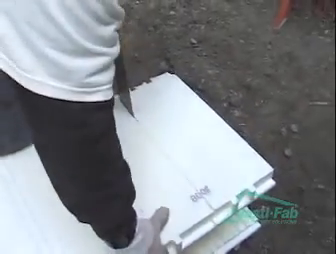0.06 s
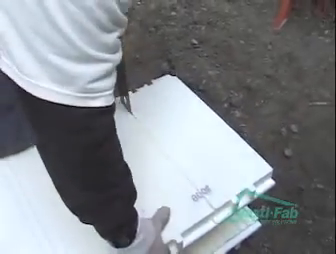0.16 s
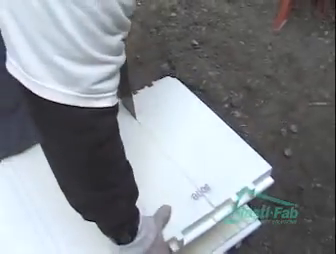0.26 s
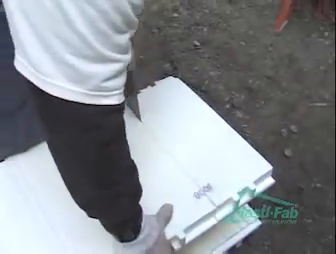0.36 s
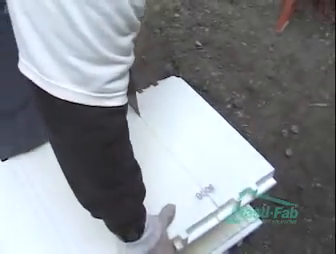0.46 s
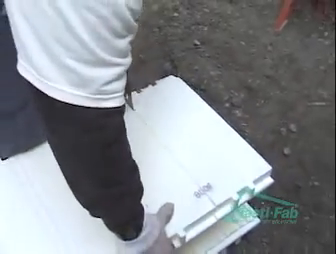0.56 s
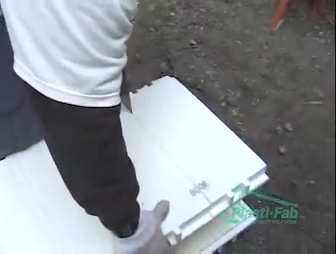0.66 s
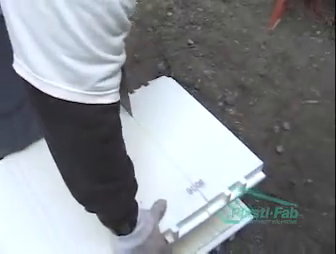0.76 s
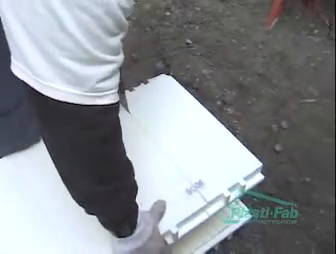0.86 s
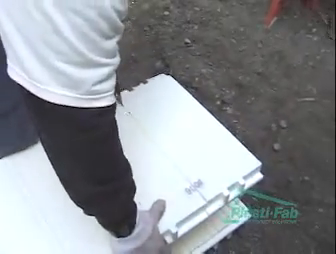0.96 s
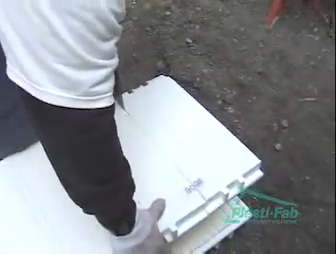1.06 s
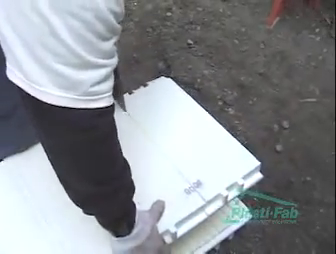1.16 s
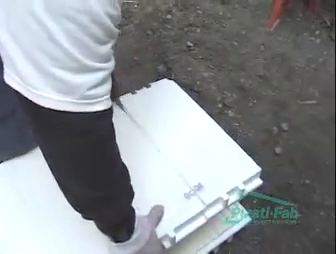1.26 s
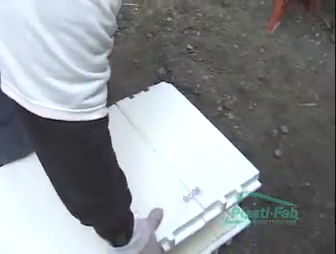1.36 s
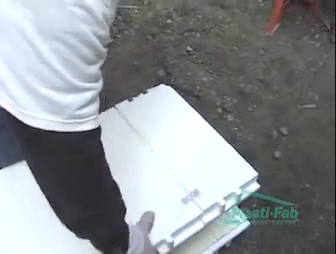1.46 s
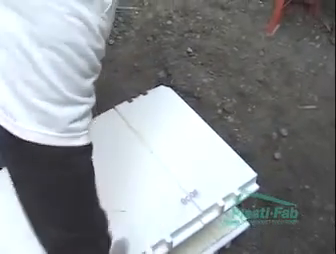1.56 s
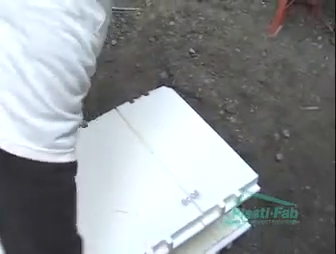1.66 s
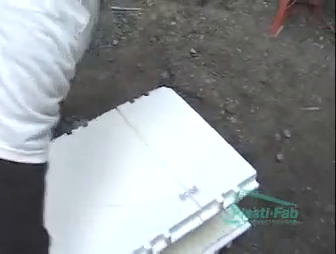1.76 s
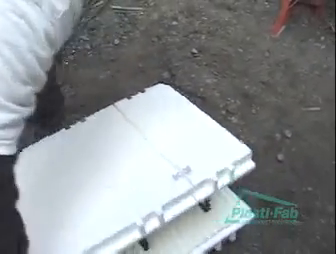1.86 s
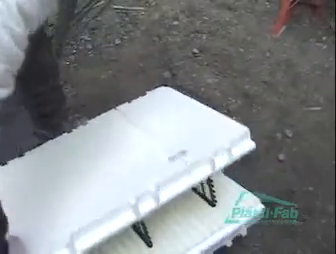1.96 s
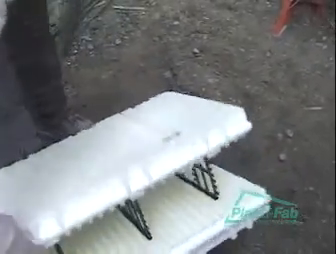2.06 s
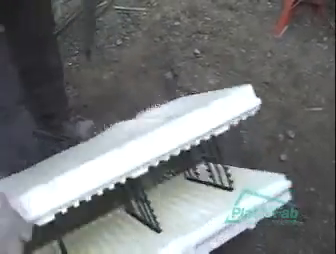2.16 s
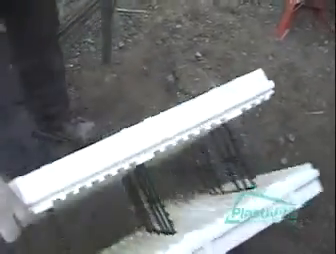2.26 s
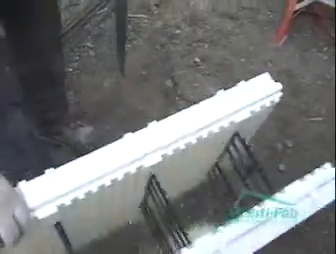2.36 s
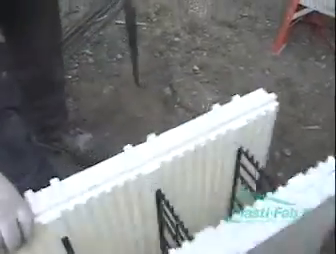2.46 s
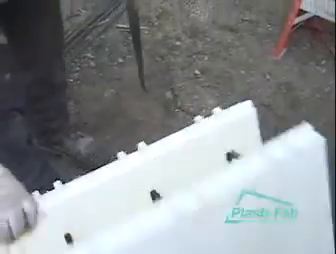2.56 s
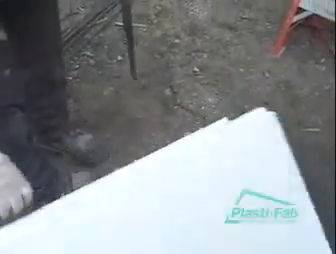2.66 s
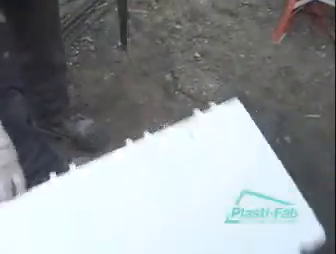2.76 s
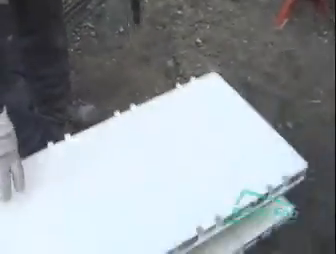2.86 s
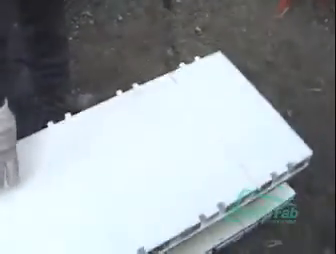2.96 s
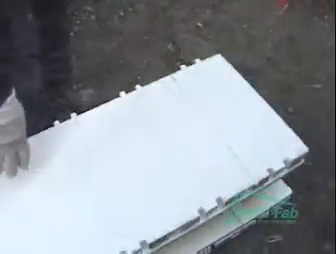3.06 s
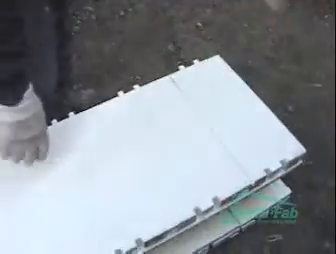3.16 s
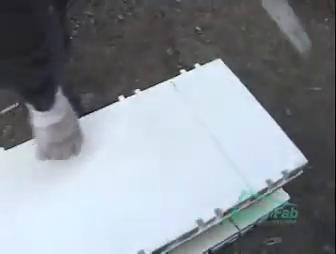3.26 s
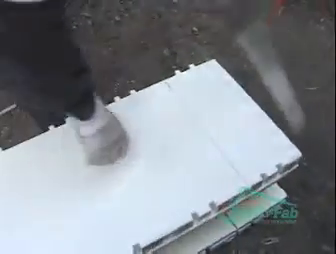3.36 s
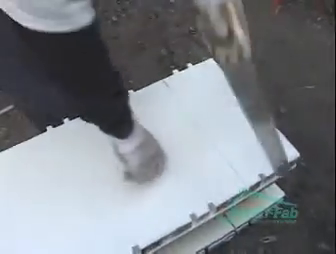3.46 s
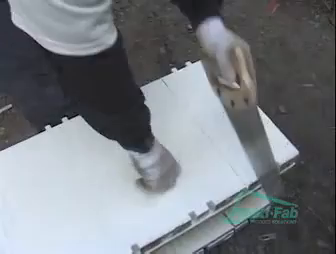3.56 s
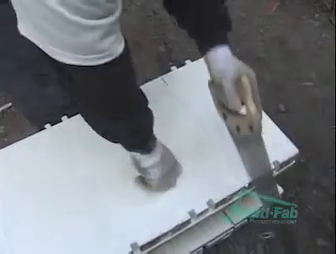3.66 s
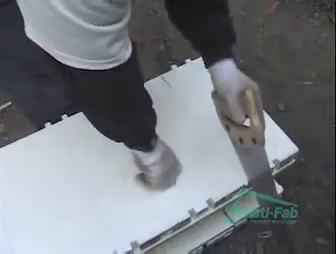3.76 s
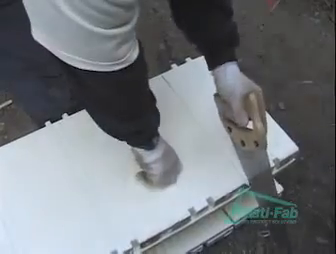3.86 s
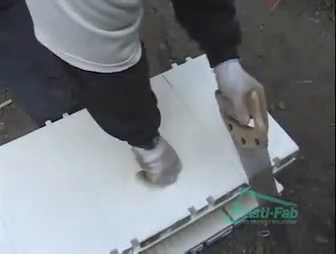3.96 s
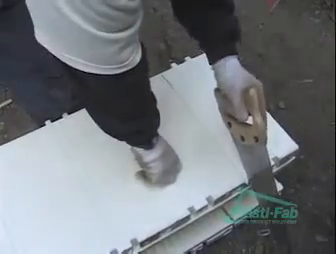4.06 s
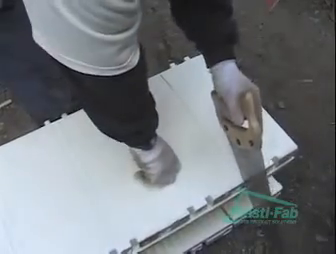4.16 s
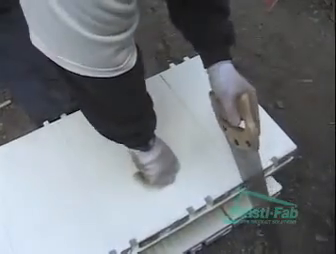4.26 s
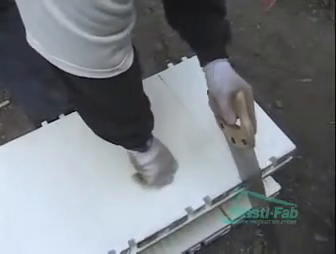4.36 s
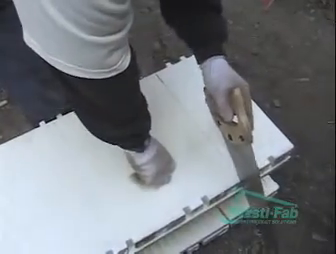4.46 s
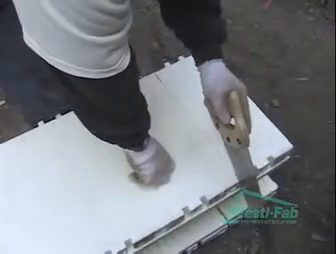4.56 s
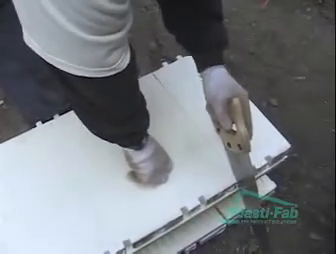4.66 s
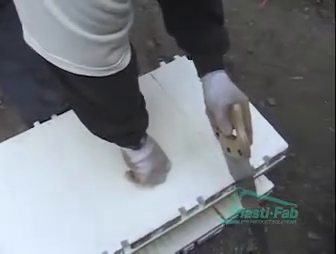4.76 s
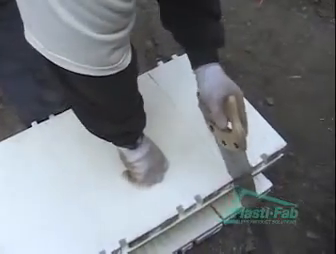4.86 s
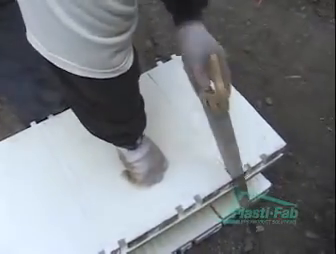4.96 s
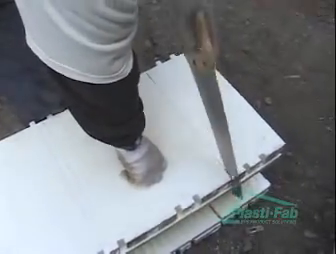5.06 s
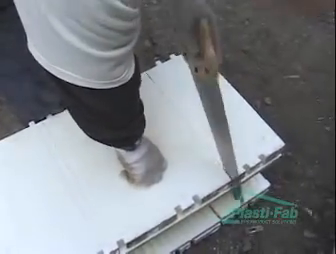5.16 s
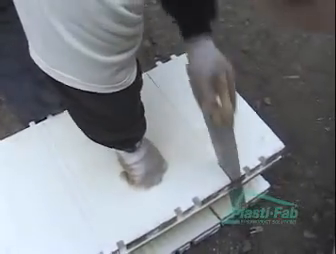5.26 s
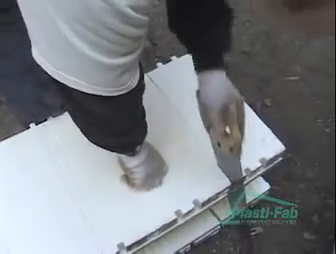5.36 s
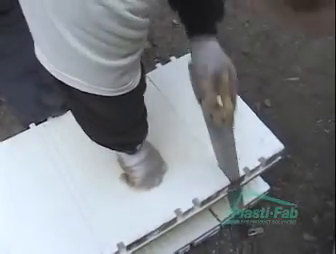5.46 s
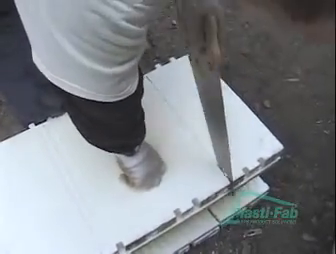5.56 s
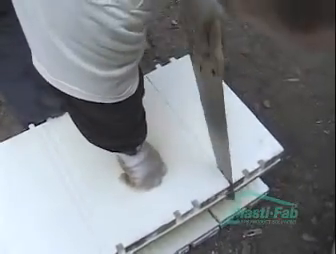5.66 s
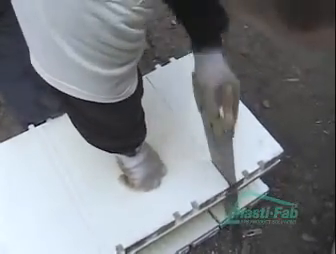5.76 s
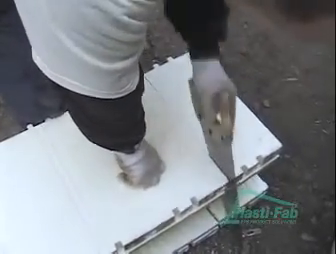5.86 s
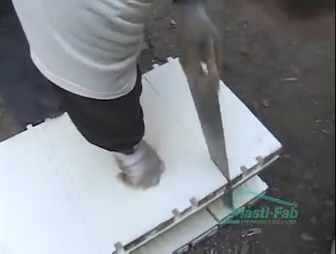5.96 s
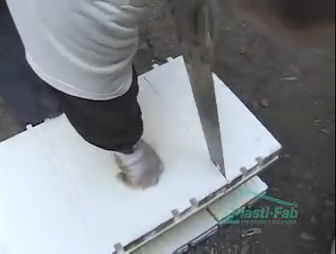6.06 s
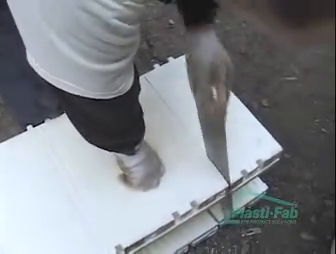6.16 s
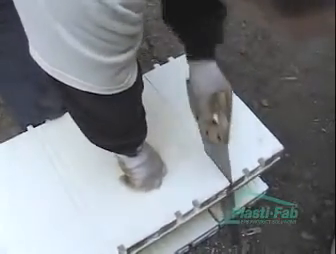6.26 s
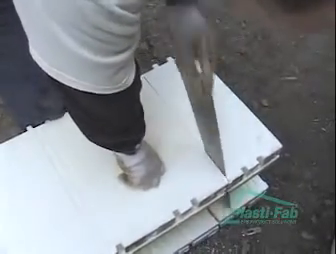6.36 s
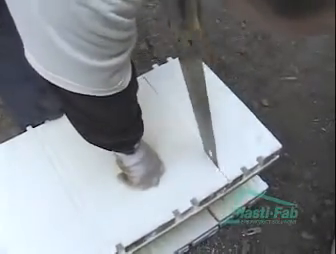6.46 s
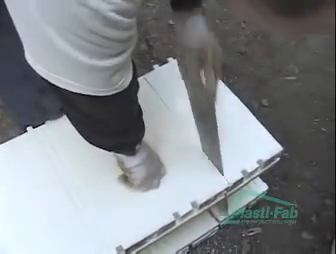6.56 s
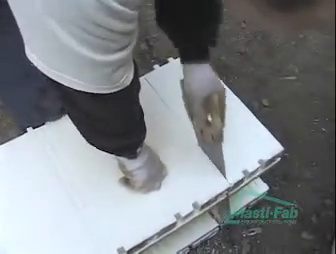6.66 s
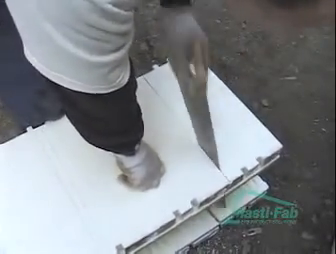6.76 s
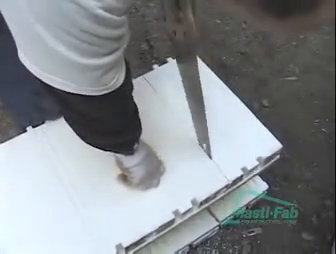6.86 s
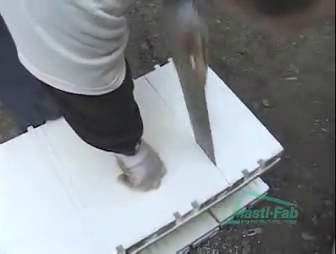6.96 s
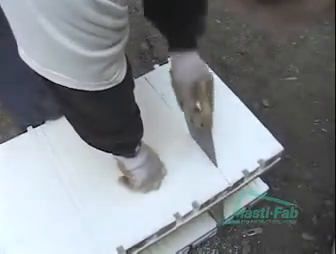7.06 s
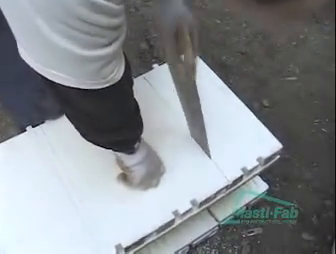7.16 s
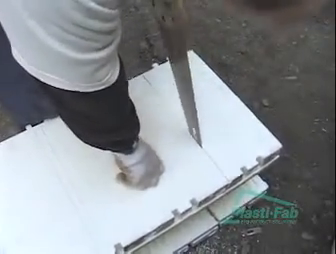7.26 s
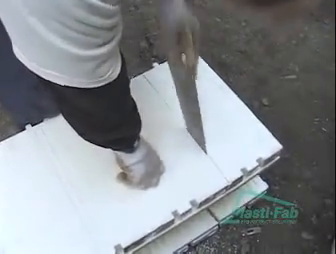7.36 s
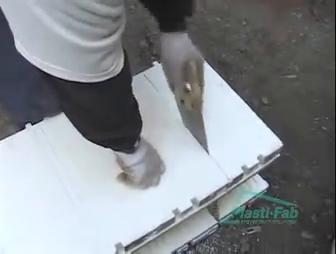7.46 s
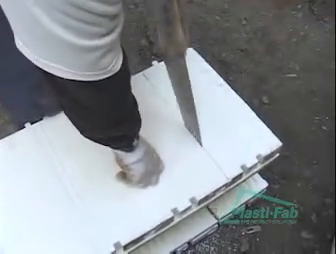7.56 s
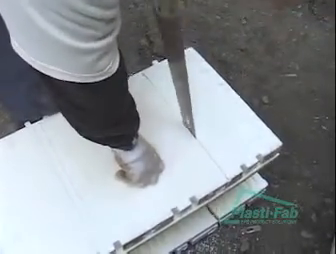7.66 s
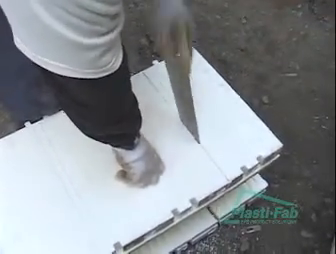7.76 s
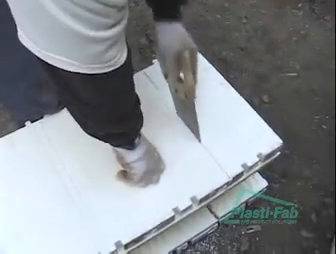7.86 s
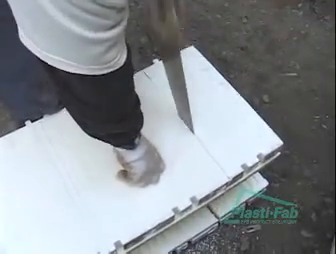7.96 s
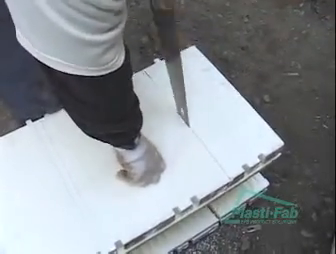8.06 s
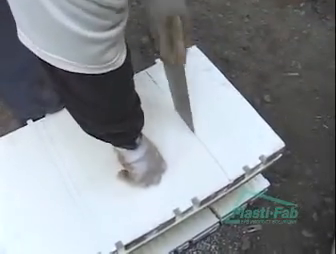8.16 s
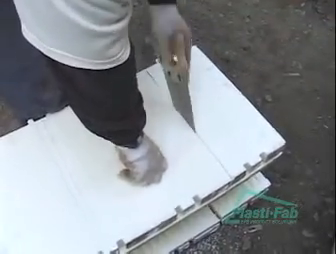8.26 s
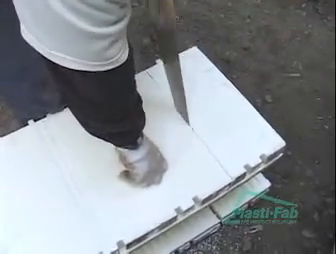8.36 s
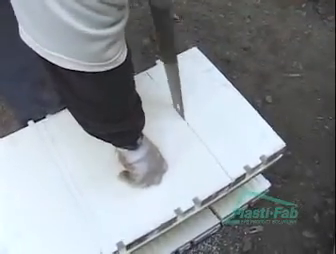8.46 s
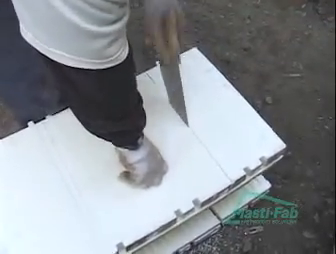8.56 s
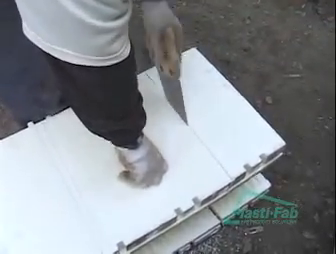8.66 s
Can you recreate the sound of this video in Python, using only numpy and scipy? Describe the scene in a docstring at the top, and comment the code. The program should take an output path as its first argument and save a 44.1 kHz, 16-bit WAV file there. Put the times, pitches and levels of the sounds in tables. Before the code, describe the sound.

Close outdoors, a handsaw rasps in quick strokes through a hollow foam block, light pull then louder booming push. The cut cracks through, foam scrapes and rumbles as the block is turned, and it lands with a cluster of loud hollow thumps. After quiet handling knocks, a slow first stroke starts a second cut that becomes steady, fast, harsher and squeaky.

```python
"""A handsaw rasps and booms through a hollow foam building block outdoors, close to the listener. The first cut
snaps through; the block is turned over amid knocks and a groan of foam on foam; then a second cut begins. Dense
clicks of tearing foam beads make the rasp and drive the panel's resonances, which give the boom. Stick-slip
tones make the squeaks, filtered noise the scratches at the turns of the blade, and decaying modes the knocks;
shaped clicks make the rumble and scrape of handling."""
import sys
import numpy as np
from scipy import signal
from scipy.fft import rfft, irfft, next_fast_len
from scipy.io import wavfile
from scipy.ndimage import uniform_filter1d

SR = 44100
rng = np.random.default_rng(int(sys.argv[2]) if len(sys.argv) > 2 else 0)


def bounce(signal):
    """Save signal as a 16-bit WAV file at the path given by the first command-line argument."""
    frames = np.transpose(np.atleast_2d(signal))
    limited = np.clip(frames, -1, 1)
    pcm = np.round(limited * 32767).astype(np.int16)
    wavfile.write(sys.argv[1], SR, pcm)


N = 383669
TIME = np.arange(N) / SR


def amp(db):
    """Level law: decibels to an amplitude factor."""
    return 10 ** (np.asarray(db) / 20)


def unit(x):
    """Normalization: scales to rms 1."""
    return x / np.sqrt(np.mean(x ** 2) + 1e-20)


def add(mix, s, sound):
    """Superposition: mixes a sound in from time s in seconds."""
    part = mix[max(round(s * SR), 0):][:len(sound)]
    part += sound[:len(part)]


def response(points, size):
    """Frequency response: gain of a (Hz, dB) table on FFT bins, interpolated over log frequency."""
    hz, db = np.transpose(points)
    bins = np.fft.rfftfreq(size, 1 / SR) + 1
    return amp(np.interp(np.log(bins), np.log(hz), db))


def colour(x, points):
    """Spectral shaping: filters by a spectrum, keeping the power of a white input."""
    size = next_fast_len(len(x) + 2048)
    return irfft(rfft(x, size) * unit(response(points, size)), size)[:len(x)]


def wander(count, hz):
    """Low-passed noise: a smooth random signal of rms 1 that moves up to about hz times a second."""
    smoother = signal.butter(2, min(hz, SR / 4), fs=SR, output="sos")
    return unit(signal.sosfilt(smoother, rng.standard_normal(count)))


def beads(per_s, spread_db):
    """Random impulse train: clicks of bursting foam beads, many small and a few large."""
    size = amp(spread_db * np.minimum(rng.exponential(1, N), 3))
    sign = rng.choice([-1, 1], N)
    bursts = rng.random(N) < per_s / SR
    return unit(size * sign * bursts)


def in_band(x):
    """High-frequency loss: soft foam makes no very high treble; a gain roughly restores the power."""
    soft = signal.sosfilt(signal.butter(6, SR / 5, fs=SR, output="sos"), x)
    return 2 * np.sqrt(2 / 3) * soft


def twitter(x, patchy_db=2.0):
    """Random local resonance: beads squeal in patches about 340 Hz wide and 17 ms long."""
    z = signal.stft(x, nperseg=512)[2]
    patches = uniform_filter1d(rng.standard_normal(z.shape), size=4, axis=0)
    patches = unit(uniform_filter1d(patches, size=3, axis=1))
    return signal.istft(z * unit(amp(patchy_db * patches)), nperseg=512)[1][:N]


def swing(start, length, top):
    """Kinematics of the arm: samples of one movement and its speed 0-1, from rest to top to rest."""
    at = np.arange(max(round(start * SR), 0), min(round((start + length) * SR), N))
    top_s = length * np.clip(top, .1, .9)
    progress = np.interp(at / SR - start, [0, top_s, length], [0, .5, 1])
    return at, np.abs(np.sin(np.pi * progress))


# Spectrum of the outdoor air. Each row: frequency in Hz, relative density in dB per Hz.
AIR_SPECTRUM = [(20, -17), (45, -1.5), (75, 6.5), (130, -2.5), (240, -7), (400, -11), (550, -9.5),
                (1000, -24), (2000, -23), (7500, -27.5)]


def outdoor_air(air_db=-55, gust_db=0.5):
    """Broadband noise: soft air whose level drifts slowly."""
    gusts = amp(gust_db * wander(N, 1.6))
    return amp(air_db) * colour(rng.standard_normal(N) * gusts, AIR_SPECTRUM)


def yard(x, near_db=-11, near_t60=0.12, far_db=-25, far_t60=1.0):
    """Scattering: quick reflections from the ground and the worker, and a faint tail from the site."""
    t = np.arange(SR) / SR
    taps = rng.choice([-1, 1], SR) * (rng.random(SR) < 2000 / SR) * (t > .004)
    near = amp(near_db) * unit(taps * amp(-60 * t / near_t60))
    far = amp(far_db) * unit(taps[::-1] * amp(-60 * t / far_t60))
    return x + signal.fftconvolve(x, (near + far) / np.sqrt(SR))[:N]


# Shoves of the hands that set the block shuddering. Each row: start in seconds, rise in seconds,
# rumble t60 in seconds, relative rumble level in dB, rub level in dB.
SHOVES = [(1.35, 0.013, 0.29, -56, -42), (1.621, 0.058, 5.7, -50.5, -47),
          (1.958, 0.059, 0.99, -43.5, -36.5), (2.12, 0.024, 0.74, -38, -42), (2.2, 0.3, 1.5, -50, -57.5),
          (2.659, .12, 1.5, -36.5, -39), (2.819, 0.034, 0.57, -34.5, -25.5), (2.89, 0.011, 0.27, -30, -17),
          (2.939, 0.012, 0.58, -22, -21), (3.129, 0.036, 0.65, -29, -27), (3.45, 0.0067, 2, -41, -46.5),
          (3.699, 0.033, 1.8, -40.5, -35), (3.913, 0.017, 1.5, -34.5, -29.5),
          (4.721, 0.14, 1.9, -44.5, -53)]
# Foam sliding on foam, dirt or glove. Each row: start in seconds, length in seconds,
# moment of top speed as a share 0-1, rasp level in dB.
SCRAPES = [(1.37, 0.083, 0.48, -51), (1.66, 0.35, 0.6, -56), (1.979, .18, 0.5, -46.5),
           (2.098, 0.15, .6, -47.5), (2.22, 0.3, 0.45, -63.5), (2.597, .16, 0.77, -43.5),
           (2.818, 0.064, 0.76, -38), (2.882, 0.042, 0.05, -43), (2.952, .12, 0, -46),
           (3.101, 0.2, 0.2, -54.5), (3.451, 0.095, .3, -51.5), (3.548, 0.095, 0.56, -51),
           (3.69, 0.14, 0.6, -46.5), (3.822, 0.17, 0.13, -56.5), (3.916, .12, 0.04, -44.5),
           (4.039, 0.063, 0.7, -54), (4.446, 0.42, 0.9, -48)]
# Spectra of rumble, rub and sliding foam. Each row: frequency in Hz, relative density in dB per Hz.
RUMBLE_SPECTRUM = [(25, -29.5), (60, -8.5), (95, -.5), (140, -2), (200, 6.5), (260, -9.5), (340, -8.5),
                   (600, -33.5), (1500, -60.5)]
RUB_SPECTRUM = [(120, -31), (260, 8), (345, 2.5), (420, 3.5), (530, 2), (700, -4.5), (950, -16),
                (1500, -24.5), (3000, -50)]
SLIDE_SPECTRUM = [(150, -25.5), (500, 2), (1200, 0), (2000, -1.5), (2800, 2), (3800, -1), (5000, 0.5),
                  (6300, 0.5), (7400, 1)]
RUB_SHARE = 0.69  # the rubbing dies in this share of the rumble's t60


def handling(rumble_db=1.5, jolt_db=1.0, slide_power=0.73, catch_db=2.0):
    """Friction noise: the block is lifted, turned and pressed down; it rumbles and its faces scrape."""
    shudder_power, rub_power, slide = np.zeros((3, N))
    t = np.arange(2 * SR) / SR
    for start, rise, t60, low_db, mid_db in SHOVES:
        attack = np.minimum(t / rise, 1)
        fade_db = -60 * np.maximum(t - rise, 0) / t60
        add(shudder_power, start, (attack * amp(low_db + fade_db)) ** 2)
        add(rub_power, start, (attack * amp(mid_db + fade_db / RUB_SHARE)) ** 2)
    jolts = unit(amp(jolt_db * wander(N, 20.7)))
    shaking = beads(3000, 0.61) * jolts * np.sqrt(shudder_power)
    rumble = amp(rumble_db) * colour(shaking, RUMBLE_SPECTRUM)
    rub = colour(beads(3000, 2.8) * jolts * np.sqrt(rub_power), RUB_SPECTRUM)
    for start, length, top, db in SCRAPES:
        at, speed = swing(start, length, top)
        slide[at] += amp(db) * speed ** slide_power
    grit = beads(14000, 2.2) * unit(amp(catch_db * wander(N, 50)))
    scrape = twitter(in_band(colour(grit * slide, SLIDE_SPECTRUM)))
    return rumble + rub + scrape


# Knocks on the block. Each row: time in seconds, relative level in dB, pitch of the push in Hz
# (soft is low), level of the crack of breaking beads in dB.
BLOWS = [(1.353, -44, 690, -28.5), (1.3552, -25, 450, -21.5), (1.623, -35, 593, -54),
         (2.754, -26.5, 225, -84), (2.894, -10.5, 750, -32.5), (2.9, -3.5, 385, -38), (2.952, -5, 168, -45),
         (2.956, -5.5, 1100, -40), (2.971, -6.5, 177, -32.5), (3.146, -23, 610, -62),
         (3.169, -11, 129, -44), (3.191, -11.5, 265, -41.5), (3.745, -28, 450, -54), (3.931, -21, 383, -55),
         (4.285, -36, 492, -38), (4.775, -35.5, 500, -37), (8.361, -34, 1313, -31.5)]
# Modes of the struck block. Each row: frequency in Hz, relative level in dB, t60 in seconds.
BLOCK_MODES = [(72, -9, 0.24), (159.44, -30, 0.15), (200, -13, 0.25), (235, -16, 0.078), (307, -4, 0.22),
               (347, -6.5, 0.27), (414, -16, 0.088), (528, 3.5, 0.079), (688, -2, 0.068), (750, -3, 0.036),
               (1020, 0, 0.011), (1337, -17.5, 0.052), (1730, -12, .05)]
# Spectrum of crushed beads. Each row: frequency in Hz, relative density in dB per Hz.
CRACK_SPECTRUM = [(200, -5), (700, 6), (1200, -0.5), (1900, 5.5), (3500, 2), (6000, -1), (7500, -5)]


def blows(push_db=-5, ring_db=-2, crack_t60=0.059):
    """Modal excitation: a soft push and rebound sets the block ringing, with a crack of crushed beads."""
    out, t = np.zeros(N), np.arange(SR // 2) / SR
    ring = sum(amp(db - 60 * t / t60) * np.sin(2 * np.pi * hz * t) for hz, db, t60 in BLOCK_MODES)
    for s, db, hz, crack_db in BLOWS:
        angle = 2 * np.pi * hz * t
        push = -np.sin(angle) * angle ** 2 * np.exp(-angle / 2)
        rung = signal.fftconvolve(push, ring)[:len(t)]
        thud = amp(push_db) * push / abs(push).max() + amp(ring_db) * rung / abs(rung).max()
        crack = colour(rng.standard_normal(len(t)) * amp(-60 * t / crack_t60), CRACK_SPECTRUM)
        add(out, s, amp(db) * thud + amp(crack_db) * crack)
    return out


# Foam squeaking on the blade or groaning on foam. Each row: start in seconds, length in seconds,
# pitch at mid-length in Hz before jitter, glide in octaves, relative level in dB, roughness 0-1.
SQUEAKS = [(0.014, 0.036, 6580, -0.73, -32.5, 0.53), (0.062, 0.054, 5950, 0.18, -27.5, 0.66),
           (0.479, 0.043, 6150, 0.67, -32, 0.47), (1.304, 0.046, 395.4, -.2, -39, 0.05),
           (2.889, 0.045, 375.7, -0.884, -15.5, 0.18), (4.956, 0.035, 4150, 2.1, -26.5, 0.78),
           (5.516, 0.044, 6800, 0.82, -41, 0.65), (5.981, 0.03, 5427, 1.5, -31, 0.82),
           (5.991, 0.033, 1893, -.8, -34, 0.65), (6.329, 0.048, 2784, 0.28, -36.5, 0.5),
           (6.393, 0.051, 3330, -.15, -32, .12), (6.428, .022, 2080, -1.4, -32, 0.72),
           (6.65, 0.016, 6050, 0.77, -34, 0.22), (6.805, 0.02, 6850, 0.35, -32, 0.54),
           (6.807, 0.035, 3190, -.1, -33, 0.15)]
# Spectrum of a rough slip. Each row: frequency in Hz, relative density in dB per Hz.
SCRATCH_SPECTRUM = [(500, -7), (1450, 6.5), (2300, -1), (3600, -7), (5000, 6.5), (7500, 9.5)]


def squeaks(arch=.2, jitter_hz=500, overtone_db=-13, clean_db=-1):
    """Stick-slip: an arched, unsteady pitch that roughness breaks up into a scratch of squealing beads."""
    tones, scratches = np.zeros((2, N))
    for start, length, hz, glide, db, rough in SQUEAKS:
        u = np.linspace(0, 1, round(length * SR))
        jitter = (.02 + .25 * rough ** 2) * wander(len(u), min(jitter_hz, hz / 3))
        octaves = glide * (u - .5) - arch * (2 * u - 1) ** 2 + jitter
        phase = 2 * np.pi * np.cumsum(hz * 2 ** octaves) / SR
        grip = amp(3 * wander(len(u), 250))
        tone = unit(grip * (np.sin(phase) + amp(overtone_db) * np.sin(2 * phase)))
        scratch = in_band(colour(rng.standard_normal(len(u)), SCRATCH_SPECTRUM))
        swell = amp(db) * np.sin(np.pi * u)
        add(tones, start, amp(clean_db) * (1 - rough ** 2) * tone * swell)
        add(scratches, start, rough ** 2 * scratch * swell)
    return tones + twitter(scratches, patchy_db=3.5)


# Cycles of the saw, a light pull back and then a cutting push. Each row: start in seconds,
# pull length in seconds, push length in seconds, pull rasp in dB, push rasp in dB, push boom in dB,
# scratch at the turn in dB; all levels are relative.
CYCLES = [(-.34, 0.2, .2, -49, -37, -33.5, -47), (0.054, 0.22, 0.22, -40, -39.5, -35.5, -40),
          (0.471, 0.22, 0.21, -42.5, -40, -36, -42), (.891, 0.22, 0.23, -42.5, -37, -37.5, -42),
          (4.335, 0.25, .36, -51.5, -45.5, -46, -70), (4.95, 0.3, .255, -41, -36, -29.5, -56),
          (5.502, .25, 0.21, -43.5, -35, -30.5, -47), (5.961, 0.23, 0.2, -44.5, -34, -29.5, -48),
          (6.388, 0.21, .21, -41.5, -34, -30.5, -36.5), (6.796, 0.22, .192, -43.5, -35, -30.5, -37),
          (7.192, 0.22, 0.19, -43, -34.5, -30.5, -33), (7.584, 0.21, 0.2, -43, -35, -30.5, -34),
          (7.98, 0.2, 0.2, -41.5, -34, -29, -37), (8.375, 0.2, 0.21, -41.5, -34, -29.5, -45.5)]
PULL_BRAKE_S, PUSH_BRAKE_S = .15, .095  # the arm slows down over this time at the end of a stroke
OVERLAP_S = 0.014  # a pull dies away into the next push
PULL_BOOM_DB = -9.5  # a pull shakes the panel less than a push


def strokes():
    """Reciprocating motion: yields start s, length s, top speed share, rasp dB, boom dB, pulling 0 or 1."""
    for start, pull, push, pull_db, push_db, boom_db, _ in CYCLES:
        pull_s = pull + OVERLAP_S
        yield start, pull_s, 1 - PULL_BRAKE_S / pull_s, pull_db, boom_db + PULL_BOOM_DB, 1
        yield start + pull, push, 1 - PUSH_BRAKE_S / push, push_db, boom_db, 0


# Scratch of the turning blade. Each row: frequency in Hz, relative density in dB per Hz.
TURN_SPECTRUM = [(500, -9), (1000, -1), (1500, 3), (2300, -3), (3500, 2.5), (5000, -3), (7500, 0.5)]
CATCH_AFTER_S, CATCH_S = .011, .042  # the blade catches just after a pull begins
JAM_BEFORE_S, JAM_S, JAM_DB = 0.044, 0.042, 0.5  # and jams just before a push ends


def turns():
    """Low-speed friction: the blade jams as a push ends and catches as the pull begins."""
    level = np.zeros(N)
    for start, *_, db in CYCLES:
        at, speed = swing(start - JAM_BEFORE_S, JAM_S, 0.43)
        level[at] += amp(db + JAM_DB) * speed
        at, speed = swing(start + CATCH_AFTER_S, CATCH_S, .5)
        level[at] += amp(db) * speed
    scratch = colour(rng.standard_normal(N), TURN_SPECTRUM)
    return twitter(in_band(scratch) * level, patchy_db=4.5)


# Narrow resonances of the steel blade. Each row: frequency in Hz, width in Hz, boost in dB.
BLADE_MODES = [(1470, 39, 1.5), (2380, 47, 3), (2725, 340, 1.5), (3950, 65, 1), (4470, 130, -0.5),
               (6390, 14, 4.5)]


def blade(x):
    """Resonance: the steel blade lifts a few narrow bands of the rasp."""
    return x + sum((amp(db) - 1) * signal.lfilter(*signal.iirpeak(hz, hz / width, SR), x)
                   for hz, width, db in BLADE_MODES)


# The panel as the cut moves through it. Each row: time in seconds, stiffness as a factor on the
# panel's pitches, bass tilt in dB, pinch of the kerf on the blade in dB.
CUT = [(0, 0.81, -4, -12), (1.199, 0.8, -3.5, -8), (4.9, 0.88, -11, -14), (5.8, 0.95, 8, -26),
       (6.3, 1.02, 4, 1), (6.801, 0.961, 1.5, -2), (7.7, 1, 5.5, -5), (8.6, 1.1, 0.5, -6)]


def cut_state(s):
    """Slowly varying boundary: stiffness, bass dB and pinch dB, interpolated at time s."""
    times, *columns = np.transpose(CUT)
    return [np.interp(s, times, column) for column in columns]


# Blade pinched in the kerf. Each row: frequency in Hz, relative density in dB per Hz.
GRIND_SPECTRUM = [(400, -13.5), (900, -4), (1550, 6.5), (2400, -6), (4000, -16), (7500, -20)]


def grind(grind_db=-5, speed_power=1.9, chatter_db=2.0):
    """Speed-dependent friction: the kerf pinches the blade, and fast strokes grind in the middle register."""
    level = np.zeros(N)
    for start, length, top, rasp_db, _, _ in strokes():
        at, speed = swing(start, length, top)
        _, _, pinch_db = cut_state(start + length)
        level[at] += amp(rasp_db + pinch_db) * speed ** speed_power
    chatter = unit(beads(6000, 1.5) * amp(chatter_db * wander(N, 90)))
    rasping = blade(colour(chatter * level, GRIND_SPECTRUM))
    return amp(grind_db) * twitter(rasping, patchy_db=4)


# Resonances of the panel under the saw. Each row: frequency in Hz at stiffness 1, width in Hz,
# relative level in dB before the bass tilt.
PANEL_MODES = [(114, 40, -8), (154, 63, -8), (180, 26, -5), (246, 21, -4), (344, 35, -3), (395, 30, -3),
               (480, 45, -3.5), (545, 35, -4.5), (640, 60, 2), (728, 83, -7), (930, 120, -10)]


def panel(force, stiffness, bass_db, bass_hz=300, lowest_hz=105, highest_hz=1080):
    """Plate resonance: stiffness scales the mode pitches; a separate tilt raises or lowers the bass."""
    size = next_fast_len(len(force) + SR // 10)
    f = np.fft.rfftfreq(size, 1 / SR) + 1
    power = np.zeros(len(f))
    for hz, width, db in PANEL_MODES:
        mode_db = db + bass_db / (1 + (hz / bass_hz) ** 4)
        detuning = (f ** 2 - (hz * stiffness) ** 2) / (f * width)
        power += amp(mode_db) ** 2 / (1 + detuning ** 2)
    # the panel is too small to radiate deep bass and too soft to carry treble
    power /= (1 + (lowest_hz / f) ** 4) * (1 + (f / highest_hz / stiffness) ** 6)
    return irfft(rfft(force, size) * unit(np.sqrt(power)), size)


# Spectrum of the tearing teeth. Each row: frequency in Hz, relative density in dB per Hz.
RASP_SPECTRUM = [(150, -18), (500, 4), (1200, -0.5), (1600, -3), (2100, -1), (3100, -2), (4400, -1),
                 (5300, -0.5), (6300, 3.5), (7400, 0.5)]
PULL_PEAK_HZ, PULL_PEAK_WIDTH_HZ, PULL_PEAK_DB = 541, 21, 4  # a narrow band raised in these pulls


def saw(boom_power=1.25, teeth_hz=420, rasp_trim_db=-2, boom_trim_db=2.5, judder_db=0.24, catch_db=1.08):
    """Dense impulsive excitation: teeth tear beads; rasp follows blade speed, boom grows faster."""
    blade_speed, rasp, boom = np.zeros((3, N))
    tugs = unit(beads(9000, 1.2) * amp(judder_db * wander(N, 60)))
    peak = signal.lfilter(*signal.iirpeak(PULL_PEAK_HZ, PULL_PEAK_HZ / PULL_PEAK_WIDTH_HZ, SR), tugs)
    for start, length, top, rasp_db, boom_db, pulling in strokes():
        at, speed = swing(start, length, top)
        blade_speed[at] = speed
        rasp[at] += amp(rasp_db) * speed
        drive = tugs[at] + (amp(pulling * PULL_PEAK_DB) - 1) * peak[at]
        force = drive * amp(boom_db) * (speed ** boom_power + 0.02)
        stiffness, bass_db, _ = cut_state(start)
        add(boom, start, panel(force, stiffness, bass_db))
    # each passing tooth lifts the rasp a little
    tooth_rate = teeth_hz * blade_speed * (1 + .15 * wander(N, 80))
    teeth = 1 + .3 * np.cos(2 * np.pi * np.cumsum(tooth_rate) / SR)
    tearing = unit(beads(20000, 1.5) * teeth * amp(catch_db * wander(N, 70)))
    hiss = twitter(blade(in_band(colour(tearing * rasp, RASP_SPECTRUM))))
    return amp(rasp_trim_db) * hiss + amp(boom_trim_db) * boom


# Brief swings of the sound to the left. Each row: centre in seconds, length in seconds, lean 0-1.
LEANS = [(2.889, 0.041, 0.9), (4.981, 0.037, 0.83), (5.861, 0.036, 0.99)]


def scene():
    """Superposition and panning: all sources over soft outdoor air, nearly mono."""
    sources = saw() + grind() + turns() + squeaks() + handling() + blows()
    mono = yard(sources) + outdoor_air()
    lean = sum(share * np.exp(-(2 * (TIME - s) / length) ** 4) for s, length, share in LEANS)
    return mono * np.array([1 + lean, 1 - lean])


# Stereo balance. Each row: frequency in Hz, left level over right in dB.
LEFT_RIGHT = [(20, -2), (900, -1.24), (1500, 0), (8000, 0)]
EDGE_HZ = 7500  # upper band limit
OVERLOAD = .85  # amplitude that the rounded peaks approach


def record(dry):
    """Soft saturation and band limiting: lows sit slightly right, hard knocks round off, treble ends."""
    size = next_fast_len(N)
    tilt = np.sqrt(response(LEFT_RIGHT, size))
    tilted = irfft(rfft(dry, size) * np.array([tilt, 1 / tilt]), size)[:, :N]
    rounded = tilted / (1 + (tilted / OVERLOAD) ** 4) ** .25
    low_pass = signal.firwin(801, EDGE_HZ, window=("kaiser", 8), fs=SR)
    return signal.oaconvolve(rounded, low_pass[None], "same")


dry = scene()
out = record(dry)
bounce(out)
```